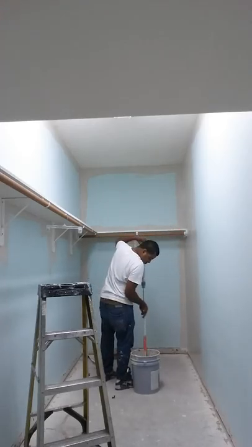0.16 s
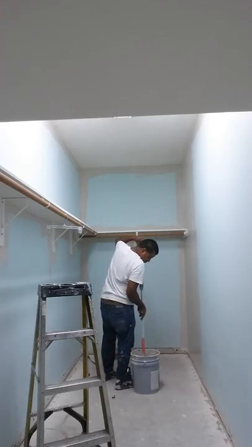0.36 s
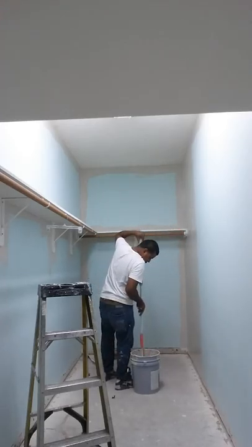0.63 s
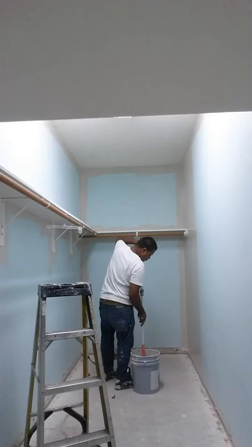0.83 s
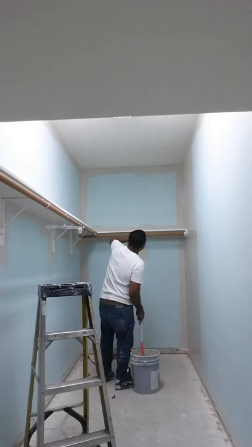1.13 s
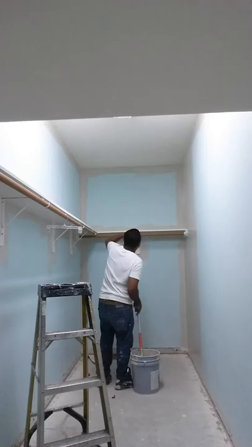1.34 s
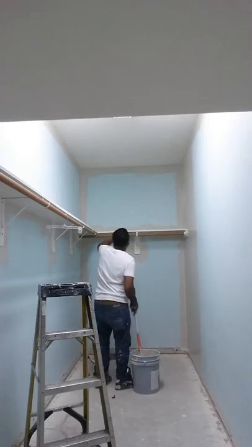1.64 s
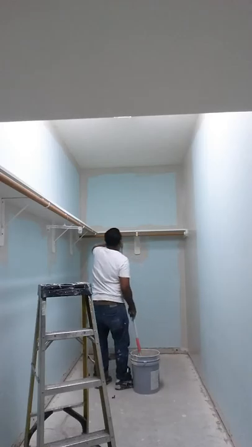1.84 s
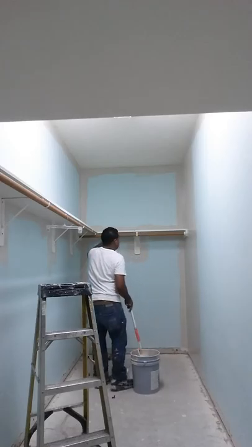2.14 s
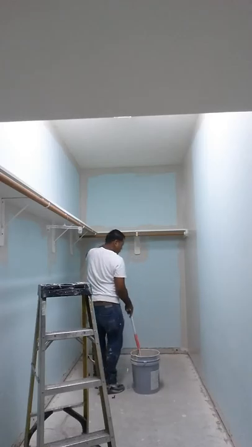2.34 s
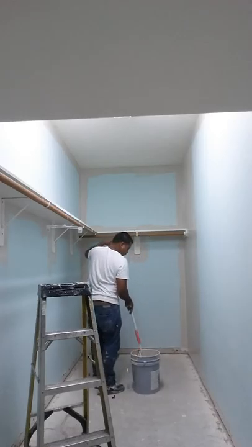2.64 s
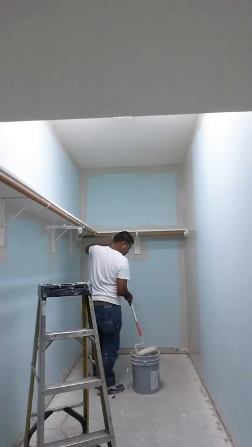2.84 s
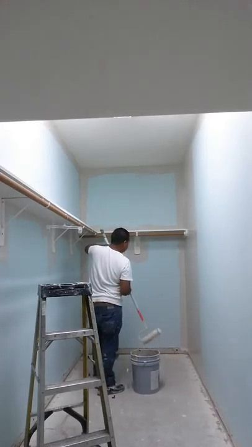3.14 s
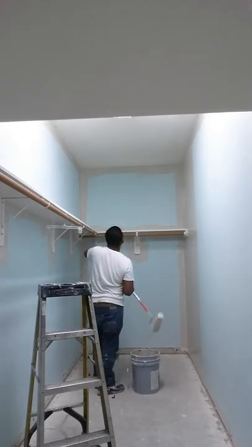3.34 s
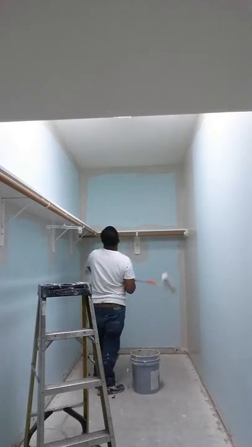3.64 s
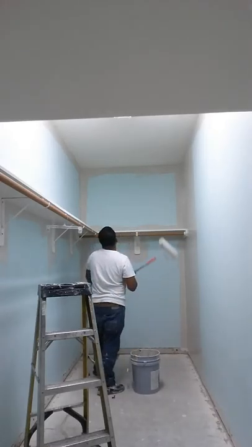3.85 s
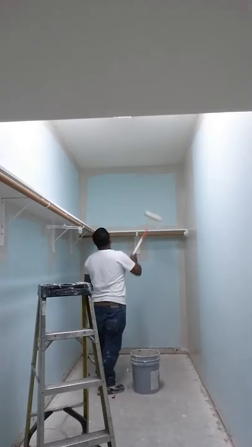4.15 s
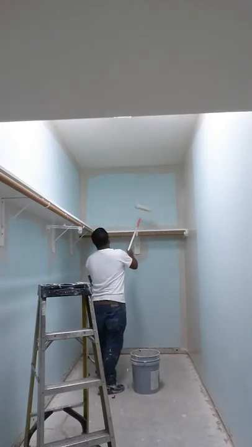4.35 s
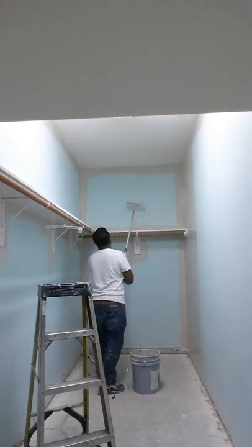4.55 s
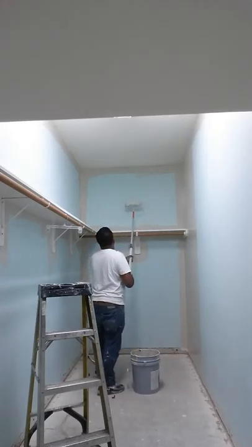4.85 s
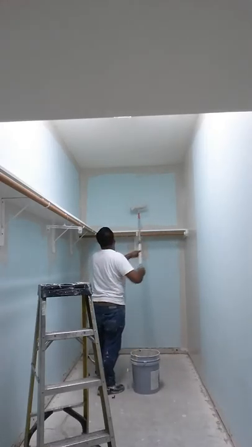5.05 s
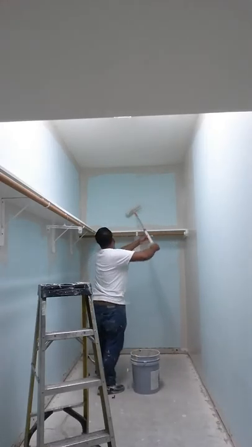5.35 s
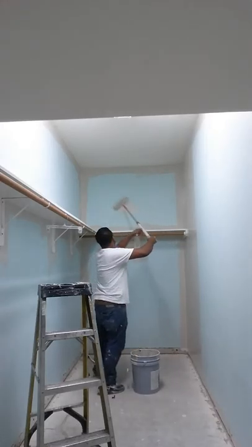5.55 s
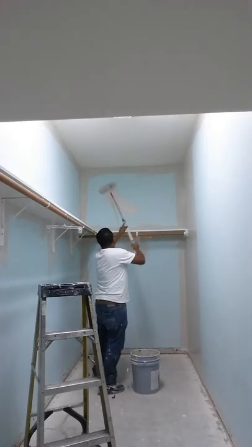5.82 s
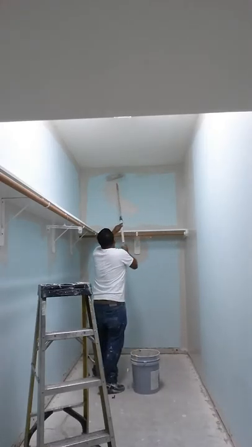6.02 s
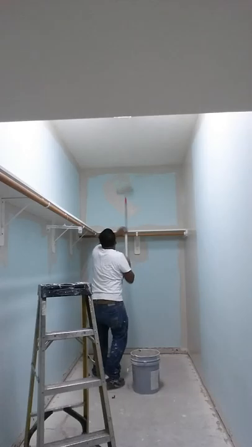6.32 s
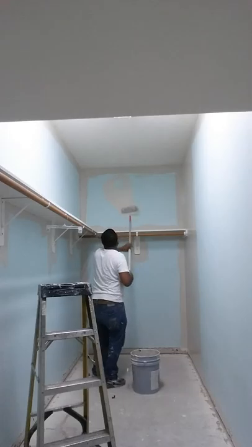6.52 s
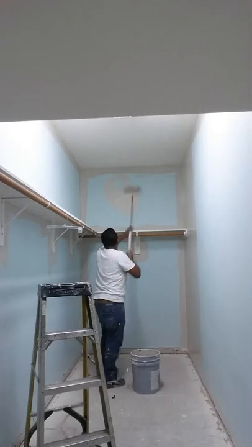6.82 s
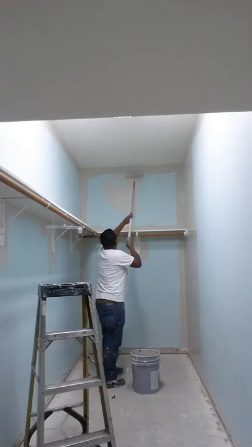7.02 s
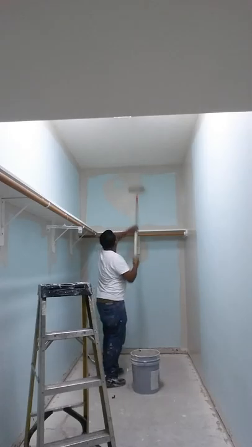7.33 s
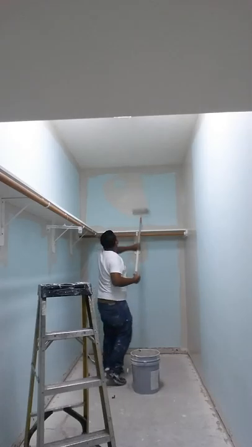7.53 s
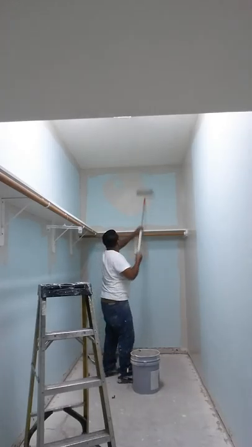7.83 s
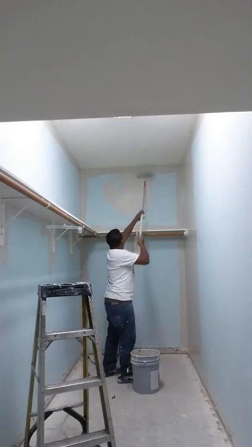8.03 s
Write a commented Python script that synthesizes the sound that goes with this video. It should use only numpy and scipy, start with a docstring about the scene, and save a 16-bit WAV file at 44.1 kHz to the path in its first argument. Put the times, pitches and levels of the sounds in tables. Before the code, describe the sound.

A bare, hard closet with faint steady air and dense echoes lasting under a second, heard in stereo from a few metres away. At 0 s a bucket knock is already dying; hollow plastic knocks and wet rubbing follow until 0.6 s. From 0.6 to 1.9 s it is quieter: soft squelches, low thuds, tiny axle squeaks and faint metal ticks near 1.0 and 1.5 s. A strong knock at 2.0 s starts a juddering flurry, thinning out by 3.1 s. At 3.4 s a heavy bump makes the wooden shelf boom. A soft wet pat at 4.1 s begins short, light, sticky dabs until 5.1 s. Longer crackling strokes with low wall rumble run from 5.4 s, growing louder after 6.4 s. At 6.8 s a very hard metal clack cracks and rings, rattling briefly. Full tacky strokes continue from 7.3 s to the end.

```python
"""Heard from a few metres off in a bare, ringing closet: a painter loads a roller in a plastic bucket. It knocks,
rubs and squelches there as the plastic and wet nap colour random snaps, while the wire axle squeaks faintly.
A bump makes the wooden shelf boom, then sticky paint goes on the wall in light dabs and longer strokes, snaps
again, louder with speed. Amid the strokes the metal pole clacks hard: a broad crack and ringing sines.
Noise-built echoes surround it all over faint air; a gain control at the microphone ducks the loudest blows."""
import sys
import numpy as np
from scipy import signal
from scipy.fft import rfft, irfft, next_fast_len
from scipy.io import wavfile
from scipy.ndimage import uniform_filter1d

SR = 44100
rng = np.random.default_rng(int(sys.argv[2]) if len(sys.argv) > 2 else 0)


def generate_wav(signal):
    """Clip the signal to [-1, 1] and save it as 16-bit WAV at the path in sys.argv[1]."""
    frames = np.transpose(np.atleast_2d(signal))
    scaled = np.clip(frames, -1, 1) * 32767
    pcm = np.round(scaled).astype(np.int16)
    wavfile.write(sys.argv[1], SR, pcm)


N = 360738  # length in samples

# Colour of the nap rubbing on bucket or wall. Each row: frequency in Hz, relative level in dB.
RUBBING_COLOUR = [(200, -18.5), (290, -5.5), (390, -2), (500, -6), (700, -3.5), (1100, -3.5), (1600, -2),
                  (2100, -4.5), (3000, -10.5), (5000, -33)]


def from_db(db):
    """Decibels to gain."""
    return 10 ** (np.asarray(db) / 20)


def rms_one(x):
    """Scale to unit rms."""
    return x / np.sqrt(np.mean(x ** 2) + 1e-20)


def at_hz(points, hz):
    """Read a table on a log-frequency axis."""
    f, value = np.transpose(points)
    return np.interp(np.log(hz + 1), np.log(f), value)


def drift(rate):
    """Slow chance: normal random values, rate per second, joined by straight lines."""
    steps = np.arange(N) / SR * rate
    return np.interp(steps, np.arange(N), rng.standard_normal(N))


def held(start, length, attack, release):
    """Attack, hold and release within one event, all in seconds."""
    t = np.arange(N) / SR - start
    return np.clip(np.minimum(t / attack, (length - t) / release), 0, 1)


def arch(start, length):
    """Speed of a stroke: up from rest and back to rest along half a sine."""
    phase = (np.arange(N) / SR - start) / length
    inside = (phase > 0) & (phase < 1)
    speed = np.zeros(N)
    speed[inside] = np.sin(np.pi * phase[inside])
    return speed


def body(spectrum, modes=(), size=8192):
    """Causal unit-energy response of an object: a broad colour with resonant peaks (Hz, width Hz, dB) on it."""
    hz = np.arange(size // 2 + 1) * SR / size
    peaks = sum(peak / (1 + (2 * (hz - f) / width) ** 2) for f, width, peak in modes)
    cepstrum = irfft(np.log(from_db(at_hz(spectrum, hz) + peaks)))
    # the first half of the cepstrum, doubled and without its zeroth term, gives a minimum-phase response
    causal = 2 * cepstrum[:size // 2] * (np.arange(size // 2) > 0)
    response = irfft(np.exp(rfft(causal, size)))
    return response / np.linalg.norm(response)


def through(x, response):
    """Pass a sound through a response."""
    return signal.oaconvolve(np.atleast_2d(x), np.atleast_2d(response), axes=1)[:, :N]


def blows(rows, crunch, crunch_s):
    """Each blow is a click followed by a short chatter of the touching surfaces; padding dulls it."""
    out = np.zeros(N + SR)
    t = np.arange(SR // 8) / SR
    for s, db, *corner_hz in rows:
        force = rng.standard_normal(len(t)) * np.exp(-t / crunch_s)
        force *= crunch / np.linalg.norm(force)
        force[0] += 1  # the click
        if corner_hz:
            force = signal.lfilter(*signal.butter(1, corner_hz[0], fs=SR), force)
        start = max(0, round(s * SR))
        out[start:start + len(t)] += from_db(db) * force / np.hypot(1, crunch)
    return out[:N]


def grains(per_s, spread_db, clump_db):
    """Tiny random snaps of uneven size whose strength drifts, so that they come in clumps."""
    uneven_db = spread_db * np.minimum(rng.exponential(1, N), 4)
    sizes = from_db(uneven_db + clump_db * drift(30))
    return (rng.random(N) < per_s / SR) * sizes * rng.choice([-1, 1], N)


def texture(snaps, level, response, rooms):
    """Grains coloured by an object; as it moves, the room's echo pattern shifts between two places."""
    sound = through(level * rms_one(snaps), response)
    place = 2 * drift(10)  # radians
    return through(sound * np.cos(place), rooms[0]) + through(sound * np.sin(place), rooms[1])


def closet(direct, size=41):
    """Stereo response of the small hard room: a weak direct sound, then dense echoes that die band by band."""
    # How long the bare room rings. Each row: frequency in Hz, time to fall by 60 dB in seconds.
    decay_times = [(60, .6), (125, 0.36), (240, 0.71), (500, 0.68), (1200, 0.98), (3000, 0.69),
                   (6000, 0.79), (10000, 0.57), (15000, 0.35)]
    t = np.arange(int(1.4 * SR)) / SR
    hz = np.arange(len(t) // 2 + 1) * SR / len(t)
    centres, t60s = np.transpose(decay_times)
    bands = [at_hz(np.c_[centres, share], hz) for share in np.eye(len(centres))]

    def dying(echoes):
        """Let each band of the echoes fade at its own rate."""
        return sum(irfft(echoes * band, len(t)) * from_db(-60 * t / t60) / np.sqrt(t60)
                   for band, t60 in zip(bands, t60s))

    echoes = rfft(rng.standard_normal((2, len(t))))
    for _ in range(2):  # even out the echo energy over all pitches
        energy = np.abs(rfft(dying(echoes))) ** 2
        echoes = echoes / np.sqrt(uniform_filter1d(energy, size=size))
    tail = dying(echoes)
    tail /= np.linalg.norm(tail, axis=1, keepdims=True)
    tail[:, 0] += direct
    return tail / np.hypot(1, direct)


def room_air():
    """Faint steady air of the closet: coloured noise, independent in each channel."""
    # Colour of the air. Each row: frequency in Hz, relative level in dB.
    air_colour = [(15, -33.5), (25, -15.5), (142, 2), (286, -14), (344, 0.5), (427, -13.5), (1500, -17.5),
                  (3540, -18.5), (6040, -15), (13800, -24), (15000, -19.5)]
    return from_db(-61.5) * through(rng.standard_normal((2, N)), body(air_colour))


def axle(room, width_hz=110):
    """The cage squeaks: short spells of fine stick-slip, each exciting one narrow resonance of the wire."""
    # Squeaks on the wire axle. Each row: start in seconds, length in seconds, pitch in Hz, relative level in dB.
    squeaks = [(1.004, 0.035, 4600, -46.5), (1.09, 0.07, 6100, -49), (1.508, 0.1, 1470, -47.5),
               (1.897, 0.046, 5550, -42), (3.162, 0.072, 6100, -56), (4.403, 0.12, 6190, -51)]
    out = np.zeros(N)
    slips = grains(per_s=3000, spread_db=3, clump_db=2)
    for s, length, hz, db in squeaks:
        resonance = signal.iirpeak(hz, hz / width_hz, fs=SR)
        out += from_db(db) * arch(s, length) * rms_one(signal.lfilter(*resonance, slips))
    return from_db(5.5) * through(out, room)


def shelf(room):
    """A soft, heavy bump makes the board boom."""
    # Dull bumps. Each row: start in seconds, relative level in dB, contact corner in Hz.
    bumps = [(3.402, -22, 300), (3.413, -16, 223), (3.429, -20, 3600), (3.458, -18, 900)]
    # Colour of the board. Each row: frequency in Hz, relative level in dB.
    board_colour = [(30, -27), (60, -19), (95, -11), (130, -2.5), (172, -9), (314, -12.5), (392, -14.5),
                    (531, -19.5), (900, -12.5), (1300, -18), (2270, -24), (5000, -20.5), (11000, -53)]
    # Resonances of the board. Each row: frequency in Hz, width in Hz, height in dB.
    board_modes = [(113, 7.5, 9.1), (139, 4.7, 9.6), (195, 23.4, 2.1), (268, 44, 2), (375, 67, 6.7),
                   (880, 44, 2.9)]
    board = through(blows(bumps, crunch=0.38, crunch_s=0.0092), body(board_colour, board_modes))
    return from_db(31.5) * through(board, room)


def pole(room):
    """A hard contact gives a broad crack and sets the metal tube ringing."""
    # Sharp contacts of pole and frame, the hardest with a rattle. Each row: start in seconds, relative level in dB.
    clacks = [(1.0207, -45), (1.5194, -36), (3.424, -30.5), (6.7815, -16.5), (6.785, -4.5), (6.822, -9.5),
              (6.865, -22), (6.902, -13.5), (6.96, -32)]
    # Ringing of pole and frame. Each row: frequency in Hz, relative level in dB, 60 dB decay in seconds.
    tube_modes = [(840, -12, 1), (1590, -9, .5), (1660, -4, 0.78), (1660, -4, 0.56), (1550, -13, .5),
                  (3460, 6, 0.36), (5070, -4.5, 0.42), (6000, -3, 0.73), (6430, 5, 0.25),
                  (6100, -11.5, 0.41), (6600, -24.5, .5), (7710, 9, 0.21)]
    # Colour of the crack. Each row: frequency in Hz, relative level in dB.
    crack_colour = [(50, -23), (115, -2), (170, -10.5), (290, -21.5), (420, -8.5), (670, -21.5), (920, -3),
                    (1350, -6), (1670, 5.5), (2200, -8), (3200, -2.5), (5000, 0), (7200, -7.5),
                    (11000, -10.5), (15500, -19.5)]
    t = np.arange(SR) / SR
    ring = sum(from_db(db - 60 * t / t60) * np.sin(2 * np.pi * hz * t) / np.sqrt(t60)
               for hz, db, t60 in tube_modes)
    crack_body = body(crack_colour, [(6270, 460, 11.1), (897, 8, 16)])
    crack = through(blows(clacks, crunch=0.56, crunch_s=0.0097), crack_body)
    ringing = through(blows(clacks, crunch=0.067, crunch_s=0.0016), ring / np.linalg.norm(ring))
    return through(from_db(28) * crack + from_db(11.5) * ringing, room)


def bucket(rooms):
    """The roller knocks and judders on the plastic while its soaked nap rubs and squelches."""
    # Knocks in the bucket, the first row the tail end of a knock already under way; padding lowers the corner.
    # Each row: start in seconds, relative level in dB, contact corner in Hz.
    knock_rows = [(0.003, -20, 1370), (0.136, -14.5, 915), (0.228, -6.5, 640), (0.447, -19, 1500),
                  (0.507, -14.5, 930), (1.296, -30.5, 4500), (1.976, 0, 1630), (2.017, -12, 1010),
                  (2.074, -11, 600), (2.113, -13, 900), (2.179, -6.5, 1110), (2.265, -12.5, 486),
                  (2.36, -12.5, 880), (2.531, -15, 487), (2.61, -7.5, 120), (2.67, -23, 144),
                  (2.833, -14, 453), (2.895, -17.5, 303)]
    # Pushes into the paint and along the bucket wall, the first row the tail end of that same knock.
    # Each row: start in seconds, length in seconds,
    # relative level of the rubbing on the bucket in dB, relative level of the wet nap in dB.
    pushes = [(-0.02, 0.047, -12.5, -28.5), (0.092, .2, -31, -49.5), (0.41, 0.15, -28, -44.5),
              (0.61, 0.21, -49, -53), (0.775, 0.16, -35, -42.5), (0.978, 0.34, -41.5, -43),
              (1.274, 0.24, -37, -43.5), (1.504, 0.12, -35.5, -41.5), (1.684, .18, -35.5, -44.5),
              (1.949, 0.086, -18, -28.5), (2.053, 0.25, -24, -45.5), (2.303, 0.13, -28.5, -39),
              (2.41, 0.067, -39, -33), (2.522, 0.17, -39, -43), (2.816, 0.06, -30, -38),
              (2.95, .12, -57, -34), (3.093, 0.045, -56, -50)]
    # The roller bottoms out and the bucket floor rumbles. Each row: start in seconds, relative level in dB.
    thuds = [(0.114, -29.5), (0.22, -39), (0.48, -38.5), (0.81, -40.5), (1.022, -42), (1.2, -41.5),
             (1.42, -37), (1.6, -39.5), (1.74, -32), (1.955, -26.5), (2.06, -35), (2.2, -38.5),
             (2.33, -34.5), (2.59, -48), (2.822, -32.5)]
    # Resonances of the plastic. Each row: frequency in Hz, width in Hz, height in dB.
    plastic_modes = [(211, 29, 8), (280.6, 22, 10), (409.8, 16, 11.5), (508, 110, 8), (608.7, 88, 10),
                     (757, 33, 10), (880, 67, 1), (958, 69, 11.5)]
    # Colours of the plastic, the hollow, the floor and the wet nap. Each row: frequency in Hz, relative level in dB.
    plastic_colour = [(45, -35.5), (100, -15.5), (150, -5), (200, -1.5), (280, -4.5), (350, -9), (580, -9),
                      (1200, -4), (1650, -4), (2000, -9), (2700, -11), (3700, -21), (5600, -17),
                      (8000, -36), (15000, -45)]
    hollow_colour = [(45, -22), (130, -17), (200, -0.5), (260, -0.5), (340, -7.5), (410, -5), (520, -16.5),
                     (600, -6), (1000, -4.5), (1600, -12), (3000, -17), (4500, -48.5)]
    floor_colour = [(30, -22), (65, -6.5), (110, -2.5), (170, -4.5), (400, -50)]
    wet_nap_colour = [(1060, -14), (1800, -24), (2230, -7), (2470, -3), (4010, -5), (4430, -2), (6070, -1),
                      (8400, -12.5), (12700, -16), (15500, -21.5)]
    rub, wet = sum(np.outer(from_db(db), held(s, length, attack=0.011, release=0.037))
                   for s, length, *db in pushes)
    press = sum(from_db(db) * held(s, length=0.073, attack=0.0051, release=0.02) for s, db in thuds)
    knocks = through(blows(knock_rows, crunch=0.41, crunch_s=0.0096), body(plastic_colour, plastic_modes))
    hollow = body(hollow_colour, [(238, 49, 1.1)])  # the air in the bucket booms
    judder = texture(grains(per_s=130, spread_db=3.5, clump_db=5.0), rub, hollow, rooms)
    squelch = texture(grains(per_s=2500, spread_db=0.5, clump_db=0.5), wet, body(wet_nap_colour), rooms)
    nap = texture(grains(per_s=1400, spread_db=1.5, clump_db=3.5), wet, body(RUBBING_COLOUR), rooms)
    rumble = texture(grains(per_s=260, spread_db=0.5, clump_db=4.0), press, body(floor_colour), rooms)
    rolling = from_db(-6.0) * judder + from_db(-1.0) * squelch + from_db(-8.5) * nap + from_db(-3.0) * rumble
    return from_db(25.0) * through(knocks, rooms[0]) + rolling


def roller(rooms):
    """Threads of paint snap, the nap rubs and the hollow wall rumbles, all louder with speed; the nap also pats."""
    # Strokes on the wall, light dabs first, then longer passes. Each row: start in seconds, length in seconds,
    # then relative levels in dB of the tearing paint, the rubbing nap and the wall rumble.
    strokes = [(4.047, 0.12, -46, -46.5, -54), (4.279, 0.15, -38, -43, -56.5),
               (4.416, 0.15, -56, -48.5, -53), (4.494, 0.26, -44.5, -48, -53), (4.7, .16, -43, -49, -56),
               (4.903, 0.051, -47, -51.5, -58), (4.964, 0.18, -55, -65.5, -68),
               (5.378, 0.14, -59.5, -54.5, -52), (5.412, 0.57, -43, -44, -44.5),
               (5.917, 0.43, -57, -58.5, -47.5), (6.243, 0.28, -42.5, -53.5, -43.5),
               (6.374, 0.33, -33, -36, -37), (6.674, 0.74, -61, -43.5, -50.5), (7.307, 0.46, -34, -41, -35),
               (7.758, 0.33, -34, -40.5, -37.5), (7.994, 0.32, -35.5, -39.5, -40)]
    # The wet nap landing on the wall. Each row: start in seconds, relative level in dB.
    landings = [(4.074, -31), (5.41, -45)]
    # Colours of the tearing paint, the wall and the landing nap. Each row: frequency in Hz, relative level in dB.
    tearing_colour = [(1000, -26.5), (1800, -8), (2600, -0.5), (3200, 0.5), (3700, -1.5), (5100, 2),
                      (6200, 1), (7700, -7.5), (10000, -11), (13200, -12.5), (15500, -19)]
    wall_colour = [(30, -14), (50, -31), (68, -12.5), (85, -4), (105, -10), (150, -10.5), (200, -6),
                   (260, -14.5), (350, -21.5), (600, -56)]
    landing_colour = [(100, -21.5), (170, -6), (280, -11), (480, -3), (850, -0.5), (1300, -10), (4500, -7),
                      (12000, -25)]
    tear, rub, press = np.zeros((3, N))
    for s, length, tear_db, rub_db, rumble_db in strokes:
        speed = arch(s, length)
        moving = speed > 0
        # each sound grows with its own power of the speed
        tear[moving] += from_db(tear_db) * speed[moving] ** 0.76
        rub[moving] += from_db(rub_db) * speed[moving] ** 1.29
        press[moving] += from_db(rumble_db) * speed[moving] ** 1.4
    wall = body(wall_colour, [(70.6, 8.2, 13.6), (192, 30, 1.7)])
    tearing = texture(grains(per_s=5000, spread_db=10.5, clump_db=1.5), tear, body(tearing_colour), rooms)
    rubbing = texture(grains(per_s=1500, spread_db=0.0, clump_db=-1), rub, body(RUBBING_COLOUR), rooms)
    rumble = texture(grains(per_s=180, spread_db=1.0, clump_db=0.5), press, wall, rooms)
    pats = through(through(blows(landings, crunch=5.2, crunch_s=0.03), body(landing_colour)), rooms[1])
    return from_db(-2.6) * tearing + from_db(-1.5) * rubbing + from_db(-4.3) * rumble + from_db(26.5) * pats


def scene():
    """Everything sounds in the same closet, low at the bucket or high on the wall, over faint room air."""
    low = closet(direct=0.22)
    high = closet(direct=0.15)
    rooms = low, high
    return room_air() + axle(high) + shelf(high) + pole(high) + bucket(rooms) + roller(rooms)


def microphones(x, mono_below_hz=820):
    """The two close ports hear the same bass, and each has its own colour."""
    # Balance of the pair. Each row: frequency in Hz, left minus right gain in dB.
    balance = [(100, -3), (550, -3), (900, -7), (1600, -8), (2400, -1), (4000, 0.5), (6000, 2.5), (7500, 1),
               (10000, -5.5), (14000, -8)]
    size = next_fast_len(N + SR // 4)
    hz = np.arange(size // 2 + 1) * SR / size
    left, right = rfft(x, size)
    alike = 1 / (1 + (hz / mono_below_hz) ** 6)
    left = alike * right + np.sqrt(1 - alike ** 2) * left
    lean = from_db(at_hz(balance, hz) / 2)
    return irfft(np.array([left * lean, right / lean]), size)[:, :N]


def gain_control(x, threshold_db=-12.0, release_db_per_s=35, attack_s=0.0022):
    """The gain drops quickly on a loud sound and creeps back up."""
    memory = np.exp(-1 / (attack_s * SR))
    power = signal.lfilter([1 - memory], [1, -memory], np.mean(x ** 2, axis=0))
    over = np.maximum(10 * np.log10(power + 1e-12) - threshold_db, 0)
    ramp = release_db_per_s * np.arange(N) / SR
    return x * from_db(ramp - np.maximum.accumulate(over + ramp))


def record(dry):
    """Microphone pair, gain control, full-scale clipping and a steep top cut at 15.5 kHz."""
    x = np.clip(gain_control(microphones(dry)), -1, 1)
    top_cut = signal.ellip(10, .2, 80, 15500, fs=SR, output="sos")
    return signal.sosfilt(top_cut, x)


dry = scene()
out = record(dry)
generate_wav(out)
```